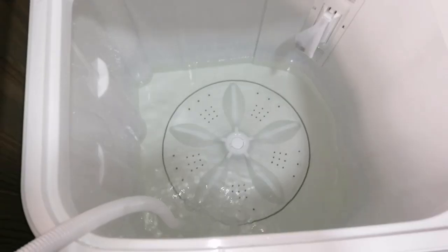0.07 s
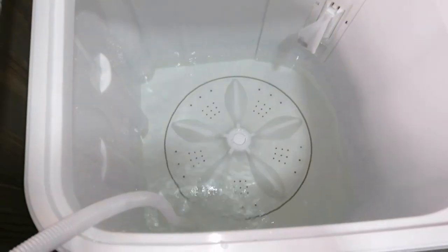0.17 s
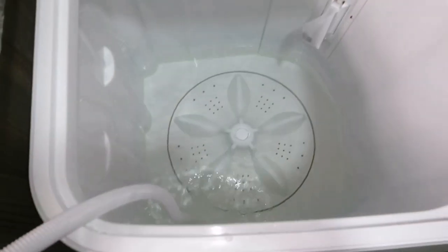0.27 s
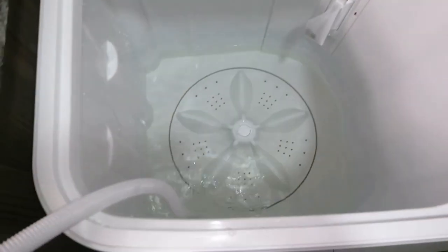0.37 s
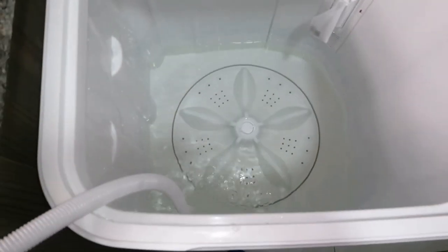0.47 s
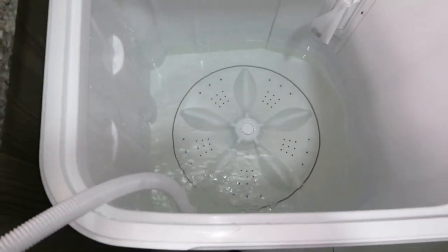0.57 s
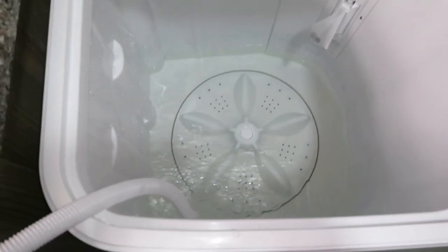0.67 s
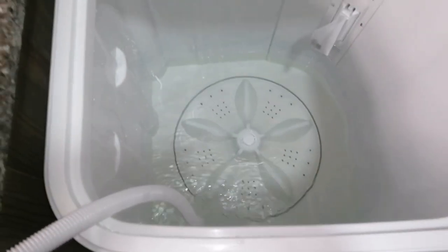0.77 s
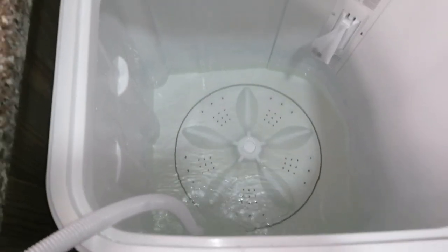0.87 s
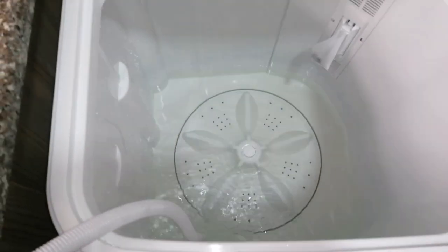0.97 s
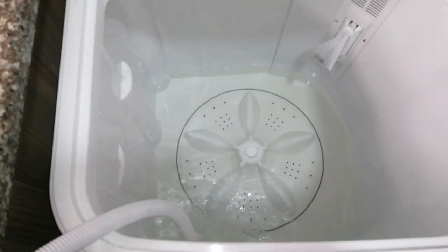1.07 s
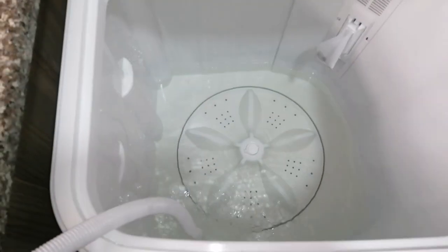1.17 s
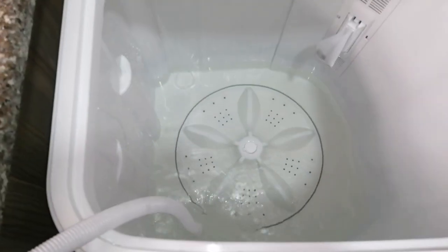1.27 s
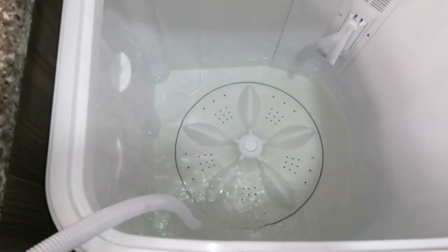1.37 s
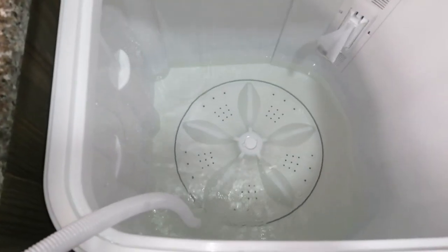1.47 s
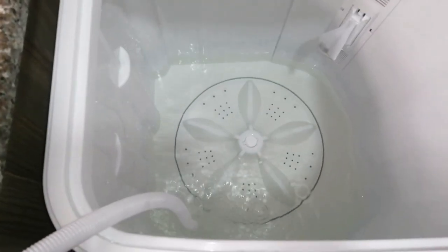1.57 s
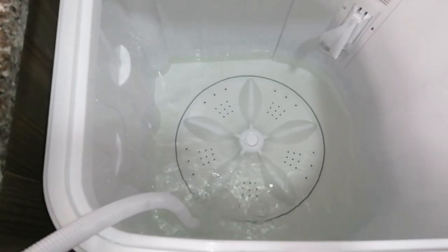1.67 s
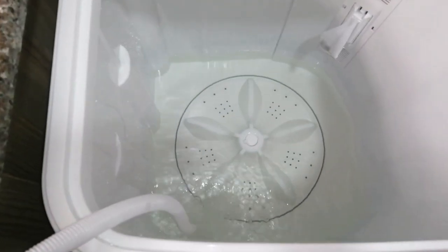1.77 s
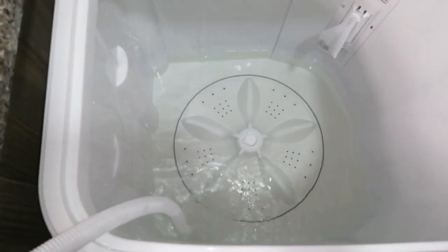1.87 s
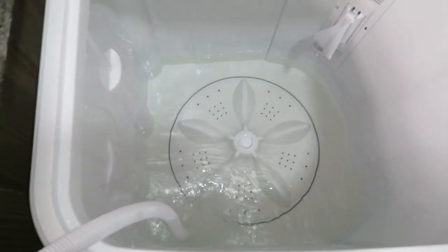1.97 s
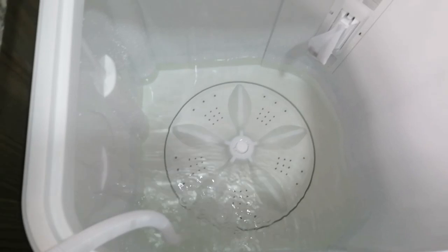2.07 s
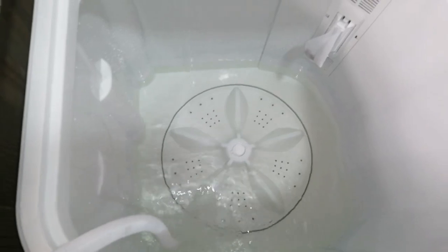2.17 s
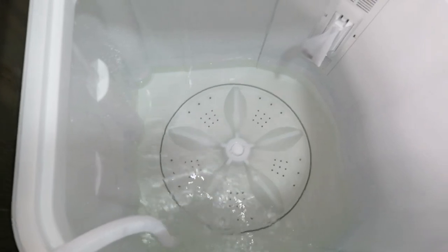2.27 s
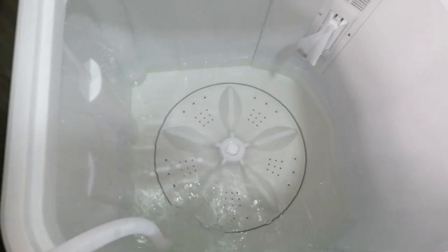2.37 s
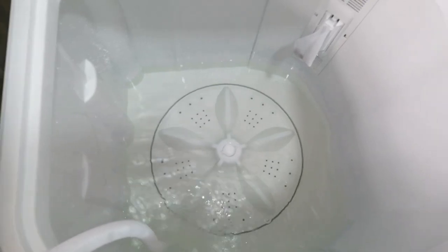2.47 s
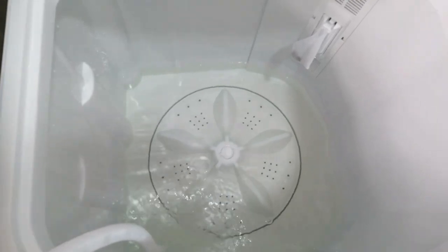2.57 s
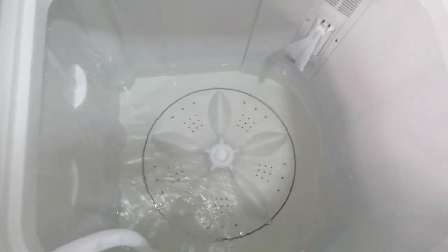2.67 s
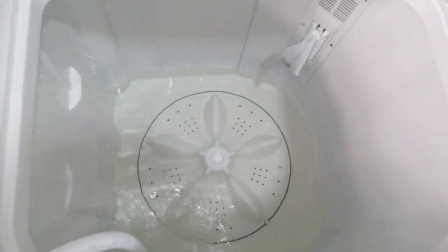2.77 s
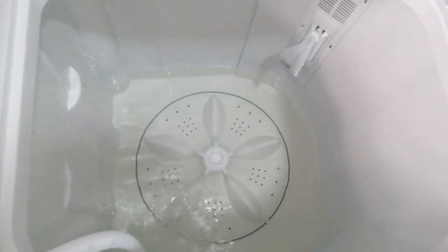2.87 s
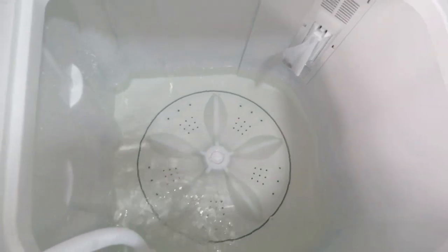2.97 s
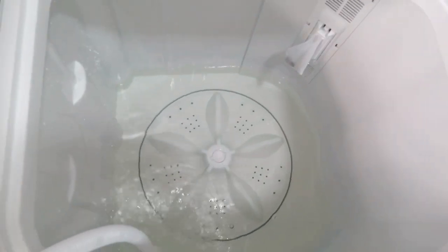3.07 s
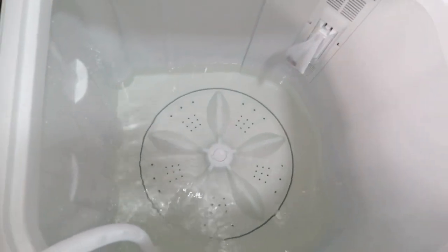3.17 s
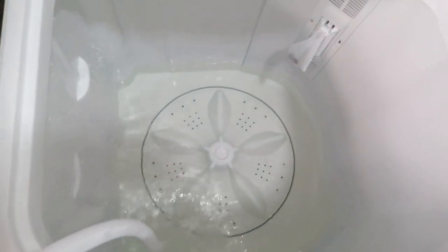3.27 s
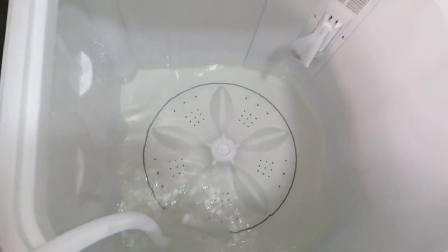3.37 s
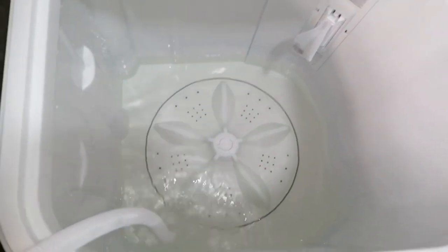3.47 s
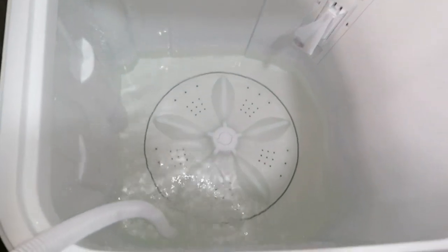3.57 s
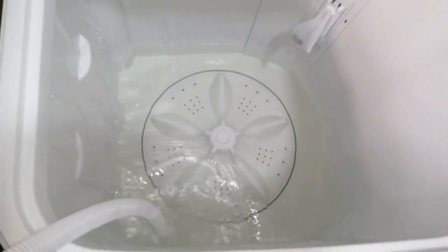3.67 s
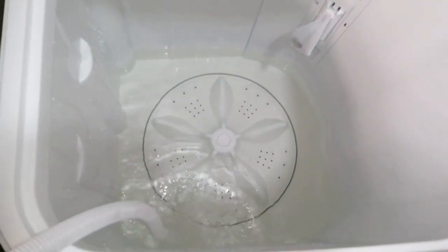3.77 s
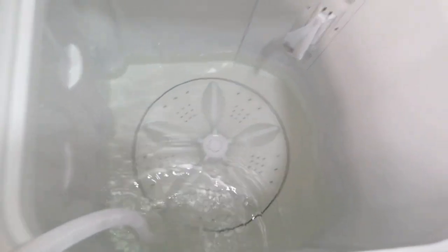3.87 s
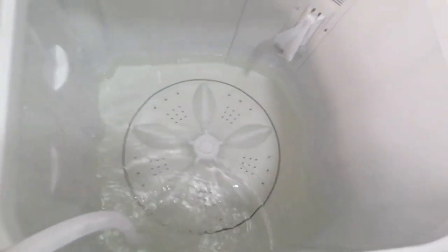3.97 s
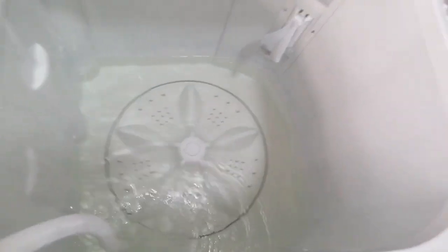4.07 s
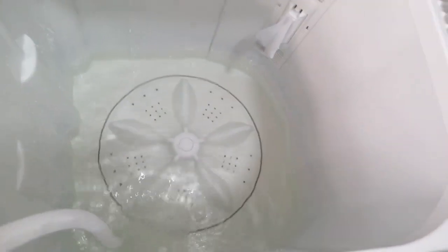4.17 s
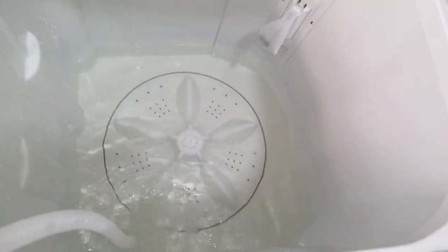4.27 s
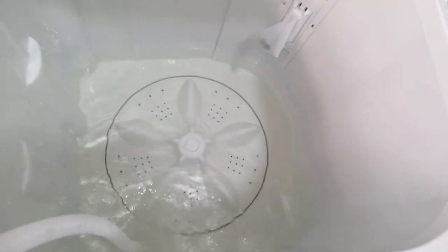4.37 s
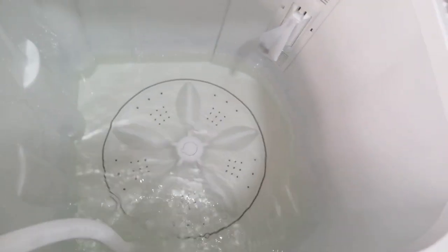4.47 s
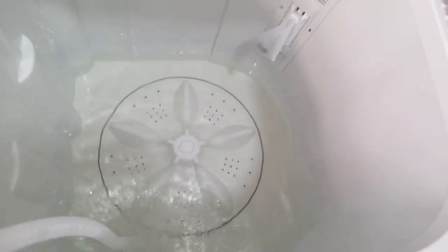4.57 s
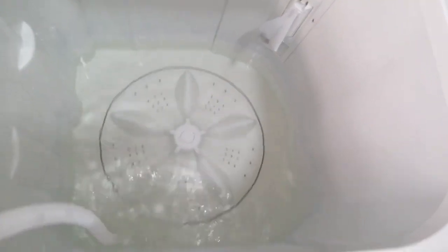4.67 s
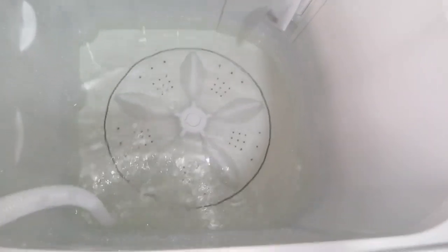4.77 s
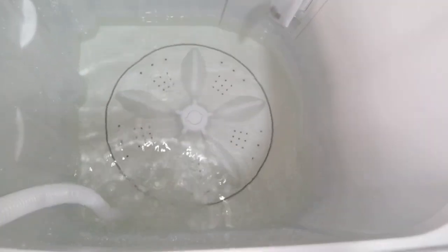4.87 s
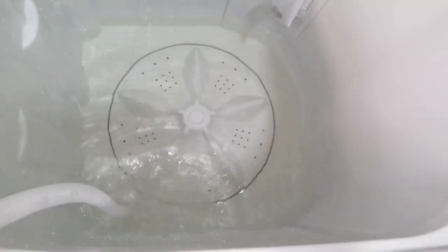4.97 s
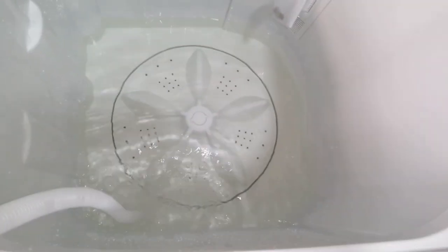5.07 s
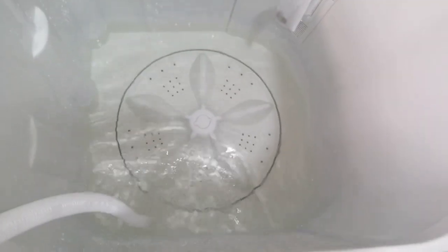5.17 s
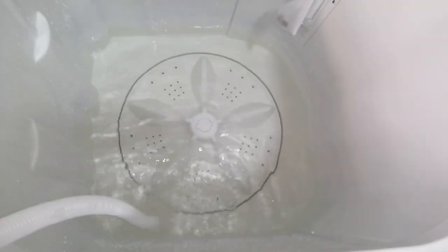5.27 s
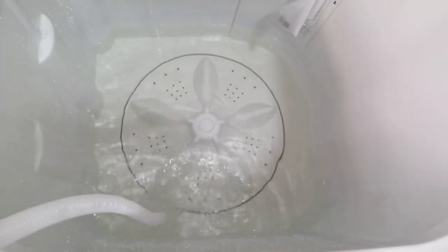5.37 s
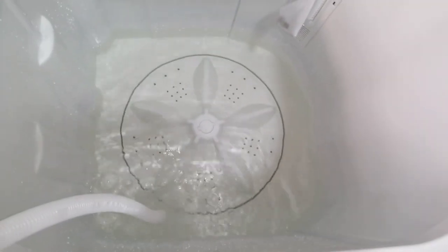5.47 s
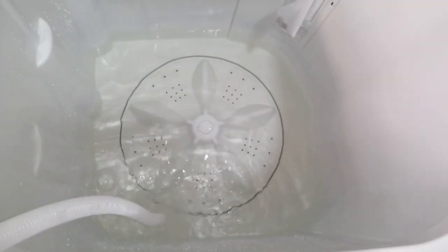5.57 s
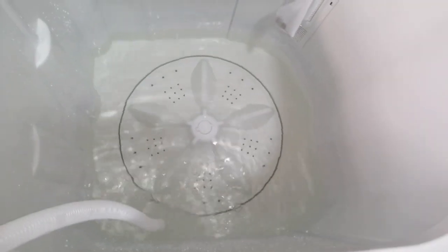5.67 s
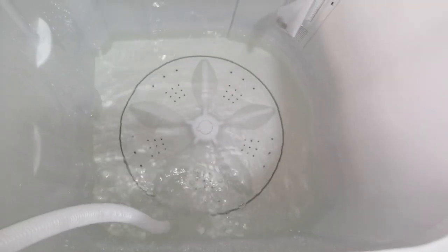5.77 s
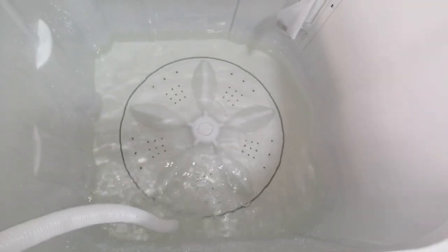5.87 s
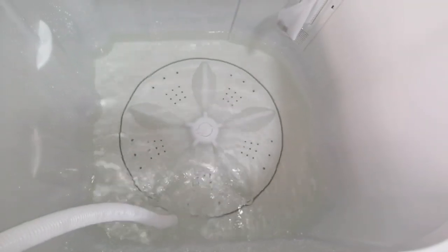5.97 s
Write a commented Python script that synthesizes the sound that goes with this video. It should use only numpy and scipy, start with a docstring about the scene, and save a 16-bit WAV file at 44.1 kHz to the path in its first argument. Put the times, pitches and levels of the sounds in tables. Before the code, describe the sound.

Water runs continuously from a hose into a partly filled washing tub indoors, heard close from above. After a moment of silence it starts abruptly, fizzy and splashing, with chirping bubble clusters and soft thuds. One sharp plastic tick comes before the middle. Towards the end the gurgling swells, deeper and busier, then eases unevenly. The tub rings hollowly, brightest on the right.

```python
"""A hose runs into the shallow water of a plastic washing tub, indoors, heard from just above the rim.
After 0.28 s of silence the sound cuts in with the hose already running: the jet drags air under, so swarms
of decaying sines thud, gurgle, babble and fizz; gulps, glugs, clusters and slaps stand out, clicks patter back.
At 2.53 s a stray drop cracks on the plastic; near 4.7 s a deep cavity boils up among crowded gulps and glugs.
Throughout, the tub and room ring, the walls rumble faintly, and the right microphone gets most of the treble."""
import sys
import numpy as np
from scipy import signal
from scipy.fft import rfft, irfft
from scipy.io import wavfile
from scipy.ndimage import uniform_filter1d, map_coordinates

SR = 44100
rng = np.random.default_rng(int(sys.argv[2]) if len(sys.argv) > 2 else 0)


def master_out(mix):
    """Clip the mix to full scale and print it as 16-bit PCM to the path in sys.argv[1]."""
    frames = np.transpose(np.atleast_2d(mix))
    ceiling = np.clip(frames, -1, 1)
    pcm = np.round(ceiling * 32767).astype(np.int16)
    wavfile.write(sys.argv[1], SR, pcm)


N = 264820

# bubble levels as the jet wanders, before class offsets: time_s, pockets_db, large_db, medium_db, small_db
JET_LEVELS = [(0.3, -58, -51.5, -47.5, -44.5), (0.41, -56, -52, -47.5, -47),
              (0.6, -55.5, -50.5, -50, -42.5), (1.05, -53, -52, -47.5, -47.5),
              (1.3, -61.5, -56.5, -54.5, -50.5), (1.52, -51.5, -50, -47, -48.5),
              (1.7, -60.5, -57.5, -58, -54.5), (2.25, -52.5, -51, -50.5, -48.5),
              (2.75, -57.5, -55.5, -53.5, -46), (3.35, -56.5, -51.5, -50, -49), (3.8, -54, -54.5, -46, -51),
              (4.15, -54.5, -56, -52.5, -46.5), (4.4, -52, -54.5, -46.5, -42.5),
              (4.5, -45.5, -59, -47.5, -52), (4.58, -50.5, -48.5, -41.5, -42.5),
              (4.7, -45.5, -42.5, -42, -43.5), (4.81, -61, -48, -51.5, -59.5), (4.91, -61, -48.5, -41, -46),
              (5.02, -48.5, -45.5, -40.5, -41.5), (5.17, -49, -51, -43.5, -43),
              (5.3, -52.5, -52, -51.5, -56.5), (5.62, -63.5, -59.5, -49.5, -50),
              (5.8, -52.5, -54.5, -45, -48.5), (6.0, -50.5, -63.5, -58, -48.5)]
# relative spectra of air pockets, three bubble sizes, fine droplets: freq_hz, density_db_per_hz
POCKET_SPECTRUM = [(15, -57), (25, 9), (48, -7.5), (86, 3.5), (133, 0), (201, -2.5), (244, -3), (296, -6),
                   (380, -14), (490, -31.5), (840, -120)]
LARGE_SPECTRUM = [(190, -11.5), (330, -2), (532, -5), (597, -6), (678, -7), (922, -3), (1110, -12),
                  (1400, -11), (1820, -15), (3080, -120)]
MEDIUM_SPECTRUM = [(900, -32), (1350, -19), (1650, -11.5), (1950, -10), (2300, -7), (2700, -4.5),
                   (3250, -2.5), (3600, -5.5), (4000, -15.5), (4500, -12), (5700, -52)]
SMALL_SPECTRUM = [(2800, -53), (4100, -10), (4600, -1.5), (5000, 1.5), (5400, 6.5), (5850, 0.5),
                  (6200, -7.5), (6700, -10), (7400, -18.5), (8200, -30), (11000, -51)]
DROPLET_SPECTRUM = [(5000, -46), (7000, -19), (8500, -0.5), (11000, -17), (14000, -3), (15000, -8),
                    (16000, -24)]
# centre pitch of the fizz as the small bubbles change size: time_s, pitch_hz
FIZZ_PITCH_TRACK = [(0.3, 5407), (2.0, 5405), (2.8, 5560), (3.2, 5694), (3.5, 5307), (4.1, 5780),
                    (4.4, 5500), (4.65, 5800), (5.1, 5404), (5.35, 5940), (5.7, 5800), (6.0, 5520)]
FIZZ_CENTRE_HZ, FIZZ_SHAKE_DB = 5450, 1.2
# rms drift of bubble pitch, share
FIZZ_DRIFT, BABBLE_DRIFT, GURGLE_DRIFT = 0.015, 0.035, 0.09
BUBBLE_PATCH_DB = 1.3


def jet():
    """Steady plunge: four bubble sizes and fine spray shaken by the same surges; returns bubbles, spray."""
    t = np.arange(N) / SR
    time_s, *columns = np.transpose(JET_LEVELS)
    pockets_db, large_db, medium_db, small_db = (np.interp(t, time_s, c) for c in columns)
    shake, dip_db = surge(per_s=45), lulls()

    pockets = cloud(POCKET_SPECTRUM, low_hz=42.0, high_hz=379.5, per_s=400,
                    cycles=1.28, glide=0.019, spread_db=1.5)
    large = cloud(LARGE_SPECTRUM, low_hz=299.1, high_hz=1432, per_s=800,
                  cycles=4.7, glide=0.033, spread_db=2.0)
    medium = cloud(MEDIUM_SPECTRUM, low_hz=1375, high_hz=4602, per_s=1700,
                   cycles=6.0, glide=0.02, spread_db=2.0)
    small = cloud(SMALL_SPECTRUM, low_hz=3900, high_hz=7930, per_s=2600,
                  cycles=4.8, glide=0.0075, spread_db=8.5)
    fine = cloud(DROPLET_SPECTRUM, low_hz=7060, high_hz=16000, per_s=540,
                 cycles=6.8, glide=0.0081, spread_db=2.5)

    thud = amp(pockets_db + 0.5 + 1.0 * shake) * pockets
    gurgle = amp(large_db - 3.5 + 0.5 * shake) * drift(large, 1 + GURGLE_DRIFT * surge(per_s=12))
    babble = amp(medium_db - 2.5 + 0.086 * shake) * drift(medium, 1 + BABBLE_DRIFT * surge(per_s=14))
    fizz_ratio = np.interp(t, *np.transpose(FIZZ_PITCH_TRACK)) / FIZZ_CENTRE_HZ
    fizz_ratio = fizz_ratio * (1 + FIZZ_DRIFT * surge(per_s=22))
    fizz = amp(small_db - 1.5 + FIZZ_SHAKE_DB * shake) * drift(small, fizz_ratio)

    # the finest spray follows the small bubbles only loosely
    spray_db = 0.5 * small_db + 0.8 * shake
    spray = amp(spray_db - 33.0) * patter(per_s=790)
    droplets = amp(spray_db - 46) * fine
    patches = batches(gurgle + babble + fizz + droplets, BUBBLE_PATCH_DB, octaves=0.276, length_s=0.035)
    return amp(dip_db) * (thud + patches), amp(0.5 * dip_db) * spray


def lulls(depth_db=2.0, before_s=0.018, width_s=0.011):
    """The stream thins out just before each slug of water lands; the dip in dB."""
    t = np.arange(N) / SR
    return -depth_db * sum(np.exp(-((t - s + before_s) / width_s) ** 2) for s, *_ in SLAPS)


# big air pockets breaking away, levels before gain: start_s, level_db, pitch_hz, breakup_db
AIR_GULPS = [(0.51, -31, 125, -45), (0.665, -37, 120, -55), (0.99, -32.5, 137, -44.5),
             (1.061, -32, 133, -56), (1.517, -34.5, 295, -46), (1.93, -34.5, 107, -54),
             (2.168, -33.5, 140, -44), (2.257, -30.5, 123, -54), (2.284, -32, 134, -52),
             (2.451, -32.5, 117, -45.5), (2.842, -33.5, 92, -48), (2.903, -42, 200, -47.5),
             (2.997, -30.5, 84, -40.5), (3.147, -39, 149, -51), (3.278, -37, 112, -47),
             (3.315, -36, 130, -64), (4.076, -26, 90.2, -48.5), (4.185, -31, 85, -45.5),
             (4.211, -29, 143, -52), (4.529, -34, 186, -48), (4.652, -32, 404, -52),
             (4.729, -25.5, 172, -49), (4.791, -28, 228, -47), (5.057, -33, 302, -43),
             (5.15, -32, 196.9, -43), (5.921, -37, 107, -58)]
# smaller pockets after a big one: level relative to its table level, decay
CHURN_DB, CHURN_T60_S = -17.5, 0.32


def gulps(cycles=1.21, glide=0.015, gain_db=-2, breakup_t60_s=0.15, rise_s=0.0051):
    """A big pocket gives a few low, damped swings and breaks into smaller pockets and large bubbles."""
    swings, churn, breakup = np.zeros((3, N))
    t = np.arange(SR // 4) / SR
    for start_s, level_db, pitch_hz, breakup_db in AIR_GULPS:
        onset = 1 - np.exp(-t * pitch_hz * 3)
        add(swings, start_s, amp(level_db + gain_db) * bubble(t, pitch_hz, cycles, glide) * onset)
        add(churn, start_s, burst(level_db + CHURN_DB, CHURN_T60_S, rise_s))
        add(breakup, start_s, burst(breakup_db, breakup_t60_s, rise_s))
    pockets = cloud(POCKET_SPECTRUM, low_hz=116.5, high_hz=336, per_s=320,
                    cycles=1.15, glide=0.033, spread_db=-3.5)
    return swings + churn * pockets + colour(breakup * patter(per_s=1500), LARGE_SPECTRUM)


# cavities opened under the surface, levels before gain: start_s, level_db, pitch_hz, t60_s, slide_oct_per_s
CAVITY_GLUGS = [(0.311, -45, 920, .07, -1), (0.341, -43, 736, 0.24, -3.5), (0.516, -37.5, 289, 0.18, -2.5),
                (0.985, -35, 290, 0.14, -3.5), (1.075, -41.5, 252, 0.34, -8.5), (1.521, -41, 602, 0.15, -2),
                (1.854, -35, 967, 0.083, -1), (1.868, -45, 317, 0.15, -19.5), (2.189, -40.5, 287, 0.15, 1),
                (2.257, -37.5, 336, 0.12, -11), (2.584, -41.5, 352, 0.19, 2.5),
                (3.004, -35.5, 617, 0.058, -9), (3.336, -44.5, 616, 0.18, -3), (3.745, -43.5, 332, .25, -3),
                (4.55, -40.5, 425, 0.34, 0.5), (4.595, -40, 608, 0.22, -2.5), (4.648, -30.5, 637, 0.11, 0),
                (4.652, -34, 410, .13, -1), (4.672, -39.5, 810, .16, -3), (4.704, -36.5, 410, 0.18, -4),
                (4.729, -31.5, 277, 0.26, -3.5), (4.79, -34.5, 232.8, 0.2, -1), (4.855, -37, 570, 0.058, 0),
                (4.959, -38.5, 948, 0.25, -1), (5.063, -30, 345, 0.11, -3.5), (5.137, -33, 545, 0.082, -24),
                (5.321, -41.5, 738, 0.17, 2), (5.744, -43, 593, 0.22, -7.5)]
GLUG_RISE_S, GLUG_ROUGH, GLUG_WOBBLE_PER_S = 0.0036, 0.76, 198


def glugs(gain_db=-4):
    """An open cavity rings with a wobbling note; it mostly sinks as the cavity grows."""
    out, t = np.zeros(N), np.arange(SR // 2) / SR
    for start_s, level_db, pitch_hz, t60_s, slide in CAVITY_GLUGS:
        knots = rng.standard_normal((2, 128))
        # complex: wobbles both level and phase
        wobble = np.interp(t * GLUG_WOBBLE_PER_S, np.arange(knots.shape[1]), knots[0] + 1j * knots[1])
        phase = 2 * np.pi * np.cumsum(pitch_hz * 2 ** (slide * t)) / SR
        note = ((1 + GLUG_ROUGH * wobble) * np.exp(1j * phase)).imag
        add(out, start_s, burst(level_db + gain_db, t60_s, GLUG_RISE_S) * note)
    return out


# relative spectrum of the one big gurgle: freq_hz, density_db_per_hz
BOIL_SPECTRUM = [(90, -25), (180, 1.5), (400, 1), (700, -2), (1000, -14), (2000, -60)]
BOIL_PEAK_S, BOIL_DB, BOIL_SWELL_S, BOIL_FADE_S, BOIL_SLIDE_OCT_PER_S = 4.71, -45.5, 0.15, 0.097, -2.5


def boil(low_hz=150, high_hz=620):
    """A deep cavity boils up as a dense mass of large bubbles, their pitch sinking as they grow."""
    t = np.arange(N) / SR - BOIL_PEAK_S
    level = amp(BOIL_DB) * np.exp(-(t / np.where(t < 0, BOIL_SWELL_S, BOIL_FADE_S)) ** 2)
    mass = cloud(BOIL_SPECTRUM, low_hz=low_hz, high_hz=high_hz, per_s=490,
                 cycles=4.5, glide=0.02, spread_db=1.5)
    return level * drift(mass, 2 ** np.clip(BOIL_SLIDE_OCT_PER_S * t, -1, 1))


# timed clusters of bubbles that pinch off together, loud and soft: start_s, peak_db, pitch_hz, t60_s
TIMED_CLUSTERS = [(0.511, -28, 5230, 0.035), (0.559, -30, 5360, 0.092), (0.61, -32.5, 3120, 0.18),
                  (0.666, -28, 3310, 0.036), (0.78, -31, 3820, 0.031), (0.932, -34, 3600, 0.14),
                  (0.979, -30, 3770, 0.1), (1.065, -29.5, 5120, 0.04), (1.188, -29, 5430, 0.06),
                  (1.226, -36.5, 5800, .07), (1.307, -34.5, 4760, 0.08), (1.469, -34.5, 2540, 0.18),
                  (1.724, -28.5, 5030, 0.035), (2.072, -35.5, 4570, 0.047), (2.131, -34.5, 3270, 0.097),
                  (2.248, -34.5, 5470, 0.058), (2.341, -29, 5600, 0.11), (2.423, -31.5, 5500, 0.079),
                  (2.496, -27.5, 5400, 0.029), (2.5335, -17.5, 5420, 0.053), (2.59, -29, 5450, 0.026),
                  (2.773, -35, 5600, 0.079), (2.81, -32, 5100, 0.059), (2.849, -34, 5580, .06),
                  (2.895, -31.5, 5400, 0.06), (2.916, -29.5, 5360, 0.054), (2.85, -38, 14500, 0.07),
                  (3.14, -33, 3610, 0.097), (3.141, -46, 8250, .1), (3.14, -32.5, 6280, 0.16),
                  (3.185, -38, 6900, .07), (3.206, -27.5, 5530, 0.035), (3.282, -42, 6900, .08),
                  (3.403, -33, 4960, 0.048), (3.465, -33.5, 2680, 0.081), (3.562, -35, 3740, 0.062),
                  (3.765, -36.5, 2225, 0.081), (3.799, -39, 6800, .06), (3.895, -44.5, 9450, .06),
                  (3.96, -34, 3870, 0.057), (3.983, -31.5, 2360, 0.18), (4.118, -22.5, 5710, 0.018),
                  (4.192, -26, 5870, 0.049), (4.331, -28.5, 5670, 0.04), (4.404, -34.5, 3070, 0.15),
                  (4.472, -21, 5790, 0.025), (4.535, -22.5, 2890, 0.059), (4.665, -27, 5340, 0.058),
                  (4.668, -27.5, 3210, 0.044), (4.705, -30, 4100, 0.035), (5.057, -22, 2630, 0.057),
                  (5.062, -38, 13000, 0.11), (5.064, -28, 2150, 0.084), (5.087, -23, 5250, 0.02),
                  (5.132, -25.5, 3320, 0.11), (5.17, -23, 3730, 0.036), (5.195, -35, 5900, 0.04),
                  (5.236, -22, 3370, 0.045), (5.329, -29, 5830, 0.033), (5.384, -29.5, 5900, 0.059),
                  (5.451, -23.5, 5880, 0.058), (5.454, -52, 8100, .06), (5.615, -43.5, 10250, .06),
                  (5.679, -25, 5800, 0.11), (5.763, -26.5, 3250, 0.039), (5.826, -26.5, 3530, 0.05)]
# further soft clusters at random moments
SOFT_PER_S, SOFT_DB, SOFT_T60_S, SOFT_LOW_HZ, SOFT_HIGH_HZ = 2.6, -45, 0.057, 2550, 6020


def plinks(gain_db=0.0):
    """Timed bubble clusters, loud and soft, and further soft ones of random pitch and time."""
    out = np.zeros(N)
    for start_s, peak_db, pitch_hz, t60_s in TIMED_CLUSTERS:
        add(out, start_s, cluster(peak_db + gain_db, pitch_hz, t60_s))
    for when, pitch in rng.random((int(SOFT_PER_S * N / SR), 2)):
        pitch_hz = SOFT_LOW_HZ + pitch * (SOFT_HIGH_HZ - SOFT_LOW_HZ)
        add(out, when * N / SR, cluster(SOFT_DB, pitch_hz, SOFT_T60_S))
    return out


# relative pitch spread within a cluster, before scaling by spread: pitch_hz, spread_share
CLUSTER_SPREAD = [(2000, 0.695), (2900, 0.315), (3700, 0.35), (5100, 0.17), (5750, 0.1), (8400, 0.096),
                  (13000, 0.23)]
# extra share of strength of a cluster's first bubbles, and its decay time
LEAD_SHARE, LEAD_S = 1.22, 0.00094
# late bubbles: level relative to the main fade, decay
STRAGGLE_DB, STRAGGLE_T60_S = -18.5, 0.28


def cluster(db, hz, t60_s, cycles=8, spread=0.29, count=170):
    """Bubbles of nearly one size pinch off: a crowded chirp, then ever sparser stragglers."""
    order = (np.arange(count) + rng.random(count)) / count
    pitch = rng.standard_normal(count)
    sign = rng.choice([-1., 1.], count)
    born_s = order ** 2 * STRAGGLE_T60_S
    fade = amp(-60 * born_s / max(t60_s, 0.01)) + amp(STRAGGLE_DB - 60 * born_s / STRAGGLE_T60_S)
    # sqrt(order) offsets the crowding of early births
    size = sign * np.sqrt(order) * fade * (1 + LEAD_SHARE * np.exp(-born_s / LEAD_S))
    pitches_hz = np.minimum(hz * np.exp(spread * read(CLUSTER_SPREAD, hz) * pitch), SR / 2)
    k = np.arange(SR // 60)
    rings = size[:, None] * bubble(k / SR, pitches_hz[:, None], cycles, glide=0.004)
    chirp = np.bincount(((born_s[:, None] * SR).astype(int) + k).ravel(), rings.ravel())
    peak_rms = np.sqrt(uniform_filter1d(chirp ** 2, size=220).max())
    return amp(db) * chirp / (2 * peak_rms)


# slugs of water slapping the surface, levels before gain: start_s, spray_db, spray_t60_s, bubbles_db
SLAPS = [(0.431, -45, 0.59, -43), (0.51, -41, 0.11, -53), (0.659, -39, 0.11, -46),
         (0.778, -40.5, 0.18, -53), (0.99, -42, 0.16, -55), (1.061, -43.5, .09, -67),
         (1.119, -42, 0.11, -69), (1.517, -45.5, 0.26, -42), (1.626, -38, 0.053, -73),
         (1.722, -38.5, 0.06, -72), (1.854, -47, 0.13, -44.5), (2.339, -47, 0.23, -46),
         (2.641, -43, 0.063, -68), (2.846, -45, 0.16, -53), (3.005, -48, 0.1, -71),
         (3.138, -44.5, 0.31, -51), (3.279, -38, 0.11, -38), (3.462, -41.5, 0.11, -50),
         (3.727, -49.5, 0.36, -41), (3.893, -42, 0.088, -73), (3.96, -52, 0.064, -41),
         (4.071, -36, 0.066, -45), (4.188, -38, 0.31, -47), (4.537, -36.5, 0.065, -51),
         (4.857, -42.5, 0.11, -35.5), (5.058, -35, 0.042, -55), (5.327, -48.5, 0.73, -70),
         (5.451, -51, 0.11, -57), (5.609, -40.5, 0.09, -49), (5.682, -47, 0.75, -71),
         (5.825, -42.5, 0.13, -57)]


def splashes(rise_s=0.0008, spray_gain_db=2, bubbles_gain_db=0, bubbles_t60_s=0.2):
    """Each slap drives medium bubbles under and throws up droplets; returns bubbles, shower."""
    shower, batch = np.zeros((2, N))
    for start_s, spray_db, spray_t60_s, bubbles_db in SLAPS:
        add(shower, start_s, burst(spray_db + spray_gain_db, spray_t60_s, rise_s))
        add(batch, start_s, burst(bubbles_db + bubbles_gain_db, bubbles_t60_s, rise_s))
    return colour(batch * patter(per_s=2700), MEDIUM_SPECTRUM), shower * patter(per_s=2000)


# stray drop striking the plastic, level before filtering: start_s, level_db
STRAY_DROPS = [(2.5326, -8)]
# relative spectrum of its crack: freq_hz, density_db_per_hz
TICK_SPECTRUM = [(1000, -40), (4000, -17), (6000, 4), (8000, 1), (12000, -4), (16000, 2.5)]


def ticks(decay_s=0.00003):
    """A single hard, bright crack where a drop hits the wall close by."""
    out, t = np.zeros(N), np.arange(SR // 50) / SR
    for start_s, level_db in STRAY_DROPS:
        add(out, start_s, amp(level_db) * np.exp(-t / decay_s))
    return colour(out, TICK_SPECTRUM)


def scatter(impacts, spectrum, direct_db=-6, wall_db=-1, wall_t60_s=0.068, room_db=-9, room_t60_s=0.63):
    """Droplets land all over the tub: echoes become noise under their level, separate per microphone."""
    t = np.arange(SR // 2) / SR
    echo_power = 0
    for db, t60_s in ((wall_db, wall_t60_s), (room_db, room_t60_s)):
        tail = amp(-60 * t / max(t60_s, 0.01))
        echo_power = echo_power + (amp(db) * tail / np.linalg.norm(tail)) ** 2
    level = np.sqrt(abs(signal.oaconvolve(impacts ** 2, echo_power)[:N]))
    direct = amp(direct_db) * impacts
    return np.array([colour(direct + level * noise, spectrum) for noise in rng.standard_normal((2, N))])


# relative spectrum of the tub wall rumble: freq_hz, density_db_per_hz
RUMBLE_SPECTRUM = [(5, -17), (25, -25), (50, -3), (90, 8), (150, -6), (400, -43), (2000, -61), (16000, -54)]


def rumble(db=-66.5, follow=0.42):
    """The tub walls rumble faintly with the air pockets, differently at each microphone."""
    time_s, pockets_db = np.transpose(JET_LEVELS)[:2]
    level_db = db + follow * np.interp(np.arange(N) / SR, time_s, pockets_db - pockets_db.mean())
    return amp(level_db) * np.array([colour(noise, RUMBLE_SPECTRUM) for noise in rng.standard_normal((2, N))])


# air resonances of the tub: freq_hz, width_hz, level_db over the direct sound
TUB_MODES = [(145, 17, -1), (178, 22, -9), (239, 12, -5), (403, 56, -7), (605, 28, -1), (730, 8.3, 3),
             (844, 8.7, -3.5), (903, 31, -10), (1240, 14, 3), (1580, 16, 2), (1945, 15, -5), (2245, 10, -5),
             (2554, 30, -3), (3266, 30, -8), (5830, 50, -5)]
# room reverberation: freq_hz, t60_s
ROOM_T60 = [(100, 0.07), (1000, 0.4), (5000, 0.33), (15000, 0.39)]


def tub(x, wall_t60_s=0.056, shared_db=-7, own_db=3, room_db=-4, scatter_hz=800, shade_hz=2500, count=4):
    """Tub air modes, quick flutter between its walls, then the room; one signal per microphone."""
    body = x + sum(amp(db) * signal.lfilter(*signal.iirpeak(hz, hz / width_hz, SR), x)
                   for hz, width_hz, db in TUB_MODES)
    # only waves shorter than the tub scatter into separate wall echoes
    short = signal.butter(2, scatter_hz, "high", fs=SR, output="sos")
    walls_t60 = [(1000, wall_t60_s), (15000, 1.15 * wall_t60_s)]
    # bubbles wander among several spots, each with its own echoes
    spots = np.array([surge(per_s=14) for _ in range(count)])
    # the direct treble is shaded from the left microphone
    shaded = signal.lfilter(*signal.butter(1, shade_hz, fs=SR), body)
    ports = np.array([shaded, body])
    for share in spots / np.linalg.norm(spots, axis=0):
        shared = amp(shared_db) * echoes(walls_t60, delay_s=0.001)
        for port in ports:
            own = amp(own_db) * echoes(walls_t60, delay_s=0.0002)
            flutter = signal.sosfilt(short, shared + own)
            room = amp(room_db) * echoes(ROOM_T60, delay_s=0.0074)
            add(port, 0, signal.oaconvolve(share * body, flutter + room))
    # the open top lets part of the sound escape, most in the treble
    escape = amp(read([(500, -1.5), (1200, -5.5), (15000, -5.5)], np.fft.rfftfreq(N, 1 / SR)))
    return irfft(rfft(ports) * escape, N)


def echoes(t60s, delay_s):
    """Sparse reflections of random sign, each band dying at its own speed; energy 1."""
    t = np.arange(SR // 2) / SR
    signs = rng.choice([-1., 1.], len(t))
    taps = signs * (rng.random(len(t)) < 3000 / SR) * (t > delay_s)
    hz, age_s, z = signal.stft(taps, SR, nperseg=128)
    decay = amp(-60 * age_s / np.maximum(read(t60s, hz), 0.01)[:, None])
    tail = signal.istft(z * decay, SR, nperseg=128)[1][:len(t)]
    return tail / np.linalg.norm(tail)


def cloud(spectrum, low_hz, high_hz, per_s, cycles, glide, spread_db):
    """A swarm of ringing bubbles of one size class, born at random moments with uneven strengths; rms 1."""
    draws = rng.random((int(per_s * N / SR), 5))
    when, pitch, strength, damping, sign = draws.T[:, :, None]
    hz = low_hz + (high_hz - low_hz) * pitch
    strength_db = spread_db * np.minimum(-np.log(1 - strength), 3)
    size = np.sign(sign - 0.5) * np.sqrt(hz) * amp(strength_db)
    k = np.arange(int(6 * cycles / low_hz * SR))
    rings = size * bubble(k / SR, hz, cycles * (0.5 + damping), glide)
    swarm = np.bincount(((when * N).astype(int) + k).ravel(), rings.ravel(), N)[:N]
    return unit(colour(swarm, spectrum))


def bubble(t, hz, cycles, glide):
    """A bubble rings down by 1/e in so many cycles; its pitch climbs as it nears the surface."""
    age = hz * t / cycles
    return np.exp(-age) * np.sin(2 * np.pi * hz * t * (1 + glide * np.minimum(age, 10) / 2))


def patter(per_s):
    """Tiny droplet impacts: a sparse train of clicks of rms 1."""
    return unit(rng.standard_normal(N) * (rng.random(N) < per_s / SR))


def burst(db, t60_s, rise_s):
    """Envelope with a fast rise and an exponential decay."""
    t = np.arange(SR // 2) / SR
    return amp(db - 60 * t / max(t60_s, 0.01)) * (1 - np.exp(-t / rise_s))


def surge(per_s):
    """Slow random unsteadiness: noise knots joined by lines, rms 1."""
    t = np.arange(N) / SR
    knots = rng.standard_normal(int(t[-1] * per_s) + 2)
    return unit(np.interp(t * per_s, np.arange(len(knots)), knots))


def drift(x, ratio):
    """Resamples a swarm so all its pitches follow a changing ratio; rms 1."""
    return unit(map_coordinates(x, [np.cumsum(ratio)], order=3, mode="grid-wrap"))


def batches(x, depth_db, octaves, length_s):
    """Bunches a swarm into short patches, each of its own pitch range, by a random time-frequency gain."""
    hz, _, z = signal.stft(x, SR, nperseg=256, noverlap=192)
    band = np.log2(1 + hz / 500) / octaves
    moment = np.arange(z.shape[-1]) * 64 / SR / length_s
    grid = np.meshgrid(band, moment, indexing="ij")
    field = map_coordinates(rng.standard_normal((64, 1024)), grid, order=1, mode="grid-wrap")
    gain = unit(amp(depth_db * unit(field)))
    return signal.istft(z * gain, SR, nperseg=256, noverlap=192)[1][..., :N]


def colour(x, spectrum, size=4096):
    """Causal minimum-phase filter of unit energy with the given spectrum."""
    gain_db = np.maximum(read(spectrum, abs(np.fft.fftfreq(size, 1 / SR))), -100)
    log_gain = np.log(amp(gain_db))
    taps = np.fft.ifft(np.exp(np.conj(signal.hilbert(log_gain)))).real[:size // 2]
    return signal.oaconvolve(x, taps / np.linalg.norm(taps))[:len(x)]


def read(points, hz):
    """Reads a table on a log-frequency axis."""
    f, value = np.transpose(points)
    return np.interp(np.log(hz + 1), np.log(f + 1), value)


def add(mix, start_s, sound):
    """Mixes a sound in at start_s, cut at the end of the mix."""
    part = mix[max(round(start_s * SR), 0):][:len(sound)]
    part += sound[:len(part)]


def amp(db):
    """Decibels to gain."""
    return 10 ** (np.asarray(db) / 20)


def unit(x):
    """Scales to rms 1."""
    return x / np.sqrt(np.mean(x ** 2) + 1e-20)


# relative spectra of the jet's spray and of the shower from a slap: freq_hz, density_db_per_hz
SPRAY_SPECTRUM = [(180, -1), (300, -17), (584, -2), (1140, -8), (1580, 3), (1750, -53), (2610, -1),
                  (2840, -31), (3520, -2), (4300, -29), (4590, -2.5), (5800, 2.5), (7690, -10),
                  (14700, -17), (16000, -5)]
SHOWER_SPECTRUM = [(200, -38), (600, 0.5), (1600, -33), (3200, -14), (4300, -5.5), (5800, 8), (7700, -12),
                   (10000, -16.5), (13000, -19.5), (15500, -12)]
SPRAY_PATCH_DB = 2.3


def scene():
    """Bubbles are heard through the tub, spray from all around it; the stray drop arrives mostly straight."""
    bubbles, spray = jet()
    trapped, shower = splashes()
    crack = ticks()
    water = tub(bubbles + plinks() + trapped + gulps() + glugs() + boil() + amp(-17) * crack)
    drops = scatter(spray, SPRAY_SPECTRUM) + scatter(shower, SHOWER_SPECTRUM)
    drops = batches(drops, SPRAY_PATCH_DB, octaves=0.2973, length_s=0.03)
    return water + drops + crack + rumble()


# level ratio applied between microphones, left over right: freq_hz, level_db
LEFT_RIGHT_LEVEL = [(10, -2), (50, 2), (90, -4.5), (160, -4), (400, -1.5), (900, -3), (1100, -9),
                    (2000, -6.5), (3300, -17), (4400, -12.5), (5900, -26.5), (8000, -13), (11000, -6.5),
                    (15000, -4)]
# phase by which the left microphone leads: freq_hz, phase_rad
LEFT_PHASE = [(860, 0), (2840, 7), (6400, 20.5)]
START_S, EDGE_HZ = 0.2805, 15700


def record(dry):
    """Shades the left microphone from the treble, silences all before START_S, then limits the band."""
    hz = np.fft.rfftfreq(N, 1 / SR)
    ratio = amp(read(LEFT_RIGHT_LEVEL, hz))
    lead = np.exp(1j * read(LEFT_PHASE, hz))
    gains = np.array([ratio * lead, np.ones_like(ratio)]) * 2 / (1 + ratio)
    heard = irfft(rfft(dry) * gains, N)
    heard = heard * (np.arange(N) / SR > START_S)
    low_pass = signal.firwin(255, EDGE_HZ, window=("kaiser", 8), fs=SR)
    return signal.oaconvolve(heard, low_pass[None], "same", axes=1)


dry = scene()
out = record(dry)
master_out(out)
```